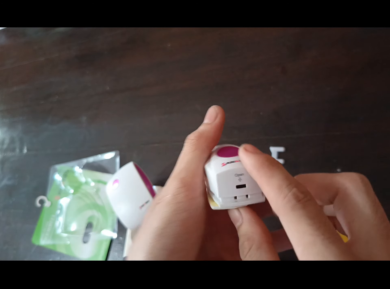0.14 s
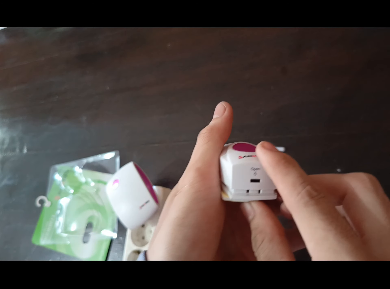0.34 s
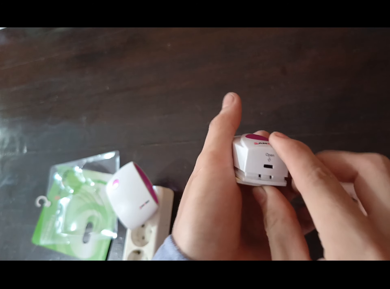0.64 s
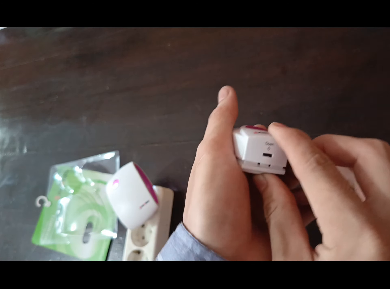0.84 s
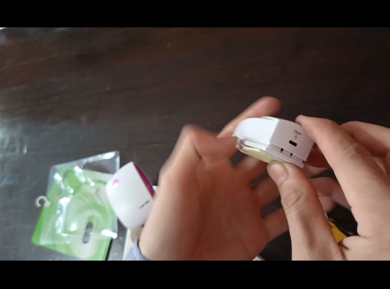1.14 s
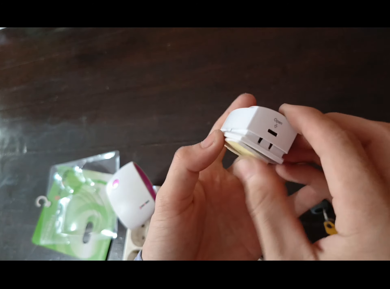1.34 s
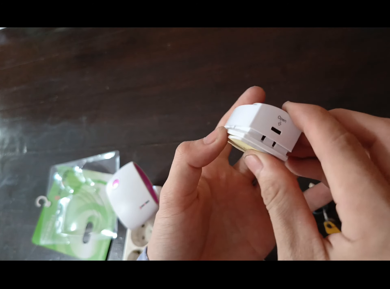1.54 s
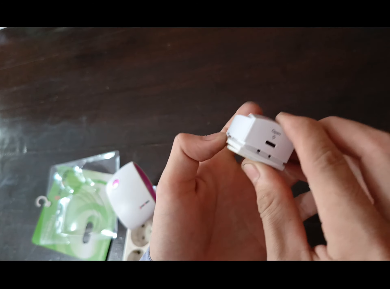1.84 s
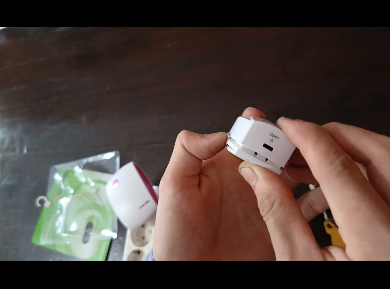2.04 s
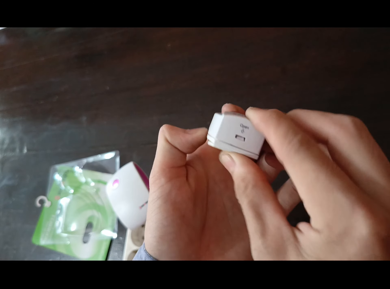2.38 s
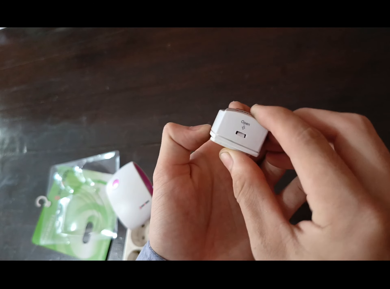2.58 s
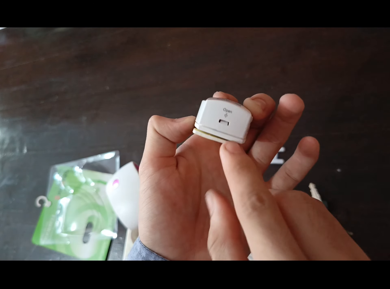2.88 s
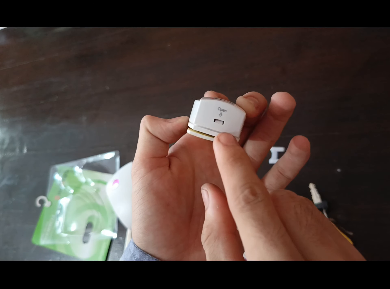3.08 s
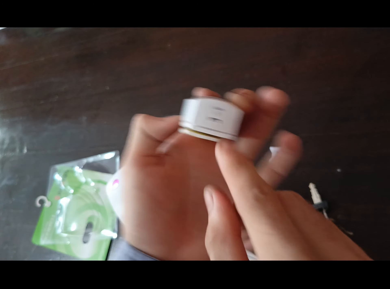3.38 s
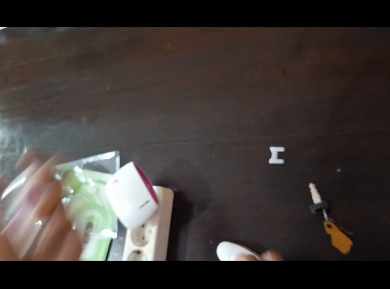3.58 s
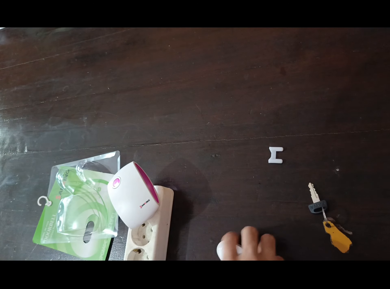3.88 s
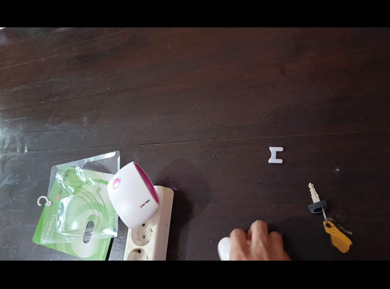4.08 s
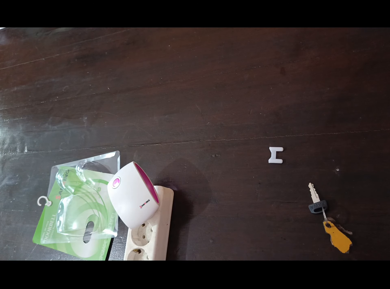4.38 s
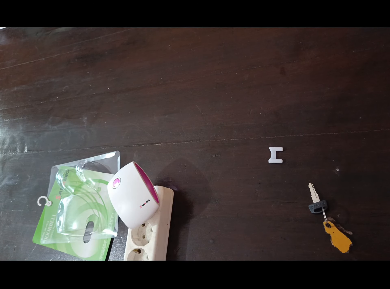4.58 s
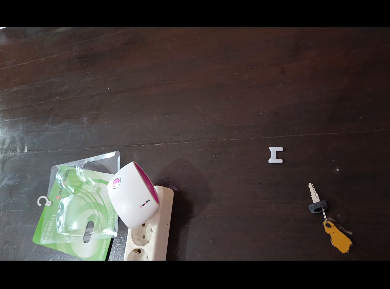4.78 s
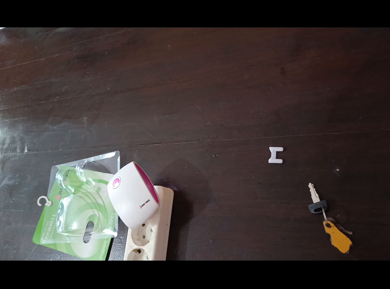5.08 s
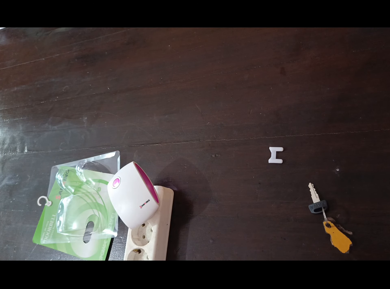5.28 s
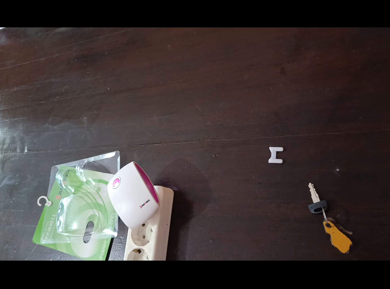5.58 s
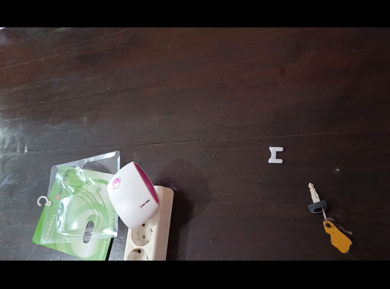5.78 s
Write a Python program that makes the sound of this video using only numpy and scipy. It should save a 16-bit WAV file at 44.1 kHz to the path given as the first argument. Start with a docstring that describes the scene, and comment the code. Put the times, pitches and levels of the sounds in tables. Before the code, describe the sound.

Close up in a quiet room, a small plastic casing clicks under pressure and snaps shut, followed by soft tabletop knocks.

```python
"""A small, quiet room: fingers press together a plastic plug-in receiver above a table, close to a phone.
Skin rubs; the seam slips in pops and creaks that ring the shell and the hollow of the hands.
The catch snaps shut, and the phone's limiter ducks the room's echo. Things put down knock on the table.
Behind it: room noise, a fading motor hum and faint birds outside."""
import sys
import numpy as np
from scipy import signal
from scipy.fft import rfft, irfft, next_fast_len
from scipy.io import wavfile
from scipy.ndimage import uniform_filter1d, minimum_filter1d

SR = 44100
rng = np.random.default_rng(int(sys.argv[2]) if len(sys.argv) > 2 else 0)


def unload_wav(signal):
    """Save mono or channel-first audio to the path in sys.argv[1] as 16-bit WAV at rate SR, clipped to [-1, 1]."""
    wavfile.write(
        sys.argv[1],
        SR,
        np.round(np.clip(np.atleast_2d(signal).T, -1, 1) * 32767).astype(np.int16),
    )


N = 261513
TIME_S = np.arange(N) / SR
RING_S = TIME_S[:SR // 2]

# room noise (frequency [Hz], gain [dB])
AIR_SPECTRUM = [(15, -69.5), (25, -36), (60, -1.5), (130, 1.5), (277, -2), (367, -6), (989, -10),
                (1250, -13), (2370, -15.5), (3290, -19.5), (4070, -19), (7000, -36), (9100, -63),
                (15400, -120)]
# room noise contour (time [s], relative level [dB])
AIR_CONTOUR = [(0.0, -60), (1.7, -64), (3.2, -64), (5.5, -62), (5.93, -59.5)]
# microphone hiss (frequency [Hz], gain [dB])
MIC_HISS_SPECTRUM = [(6500, -20), (8000, -18), (9000, -3.5), (10600, 1), (11600, -14.5), (13500, -25),
                     (15300, -8), (16000, -9.5)]
# distant calls (time [s], length [s], pitch [Hz], relative level [dB])
BIRD_CALLS = [(0.067, 0.18, 2530, -66.5), (0.168, 0.36, 2244, -66), (0.264, 0.0536, 4280, -68.5),
              (0.833, 0.096, 4300, -66.5), (4.162, 0.063, 3390, -68), (4.463, 0.059, 3510, -63.5),
              (5.205, 0.13, 2940, -68), (5.351, 0.03, 1920, -63), (5.415, 0.049, 2060, -61.5),
              (5.584, 0.034, 1874, -59.5), (5.625, 0.029, 3230, -63.5), (5.719, 0.052, 2270, -61)]
# skin on plastic and table (start [s], end [s], level [dB], relative hiss [dB])
SKIN_RUBS = [(0.268, 0.322, -77, 1), (1.069, 1.237, -77, -14.5), (2.819, 2.917, -67, -16.5),
             (3.48, 3.703, -71.5, -12.5), (3.719, 3.89, -68.5, -16), (3.941, 4.447, -78.5, -10.5),
             (4.589, 4.665, -72.5, -6.5)]
# body of a rub (frequency [Hz], gain [dB])
RUB_SPECTRUM = [(200, -0.5), (1000, -38.5), (2500, -1.5), (4400, -4.5), (6000, -11), (8000, -28),
                (16000, -40)]
# hiss of a rub (frequency [Hz], gain [dB])
SKIN_HISS_SPECTRUM = [(4000, -27), (8000, -6), (10000, -3), (12000, -2), (13500, -4), (15300, -2.5),
                      (16500, -3)]
# seam pops (time [s], relative level [dB], hollow resonance [Hz], shell brightness [dB])
SEAM_POPS = [(0.4454, -34.5, 1270, -14.5), (0.61, -38, 1097, -31), (0.7302, -39, 1080, -30),
             (0.8279, -13, 1007, -23), (.918, -30, 960, -20), (0.9909, -38, 980, -12.5),
             (1.0655, -47, 970, -16), (1.104, -45.5, 980, -2), (1.4068, -6, 1148, -16.5),
             (1.533, -40, 1310, -36), (1.5918, -28.5, 1136, -29.5), (1.6827, -9, 1065, -21.5),
             (1.6873, -15.5, 1080, -15.5), (1.988, -45, 980, -21), (2.4084, -29, 978, -20),
             (2.774, -44, 960, -2)]
# yield, jump and after-slip of each pop (lag [s], gain [dB], pitch ratio)
POP_SLIPS = [(-.0025, -22, .95), (0, 0, 0.99), (.0056, -18, 1.18)]
# seam under the thumb (start [s], end [s], slip rate [1/s], relative level [dB])
SEAM_CREAKS = [(1.335, 1.399, 174, -40.5), (1.81, 1.9, 15, -43.5), (2.273, 2.385, 21.4, -42.5),
               (2.326, 2.36, 45, -48)]
# shell at the reference grip (frequency [Hz], gain [dB], t60 [s])
SHELL_MODES = [(2660, -5, 0.0072), (3070.6, -2.5, 0.0048), (3370, -3, 0.008), (3964, -7.5, 0.0071),
               (4620, 0, .0095), (6400, -13.5, .009)]
# plastic crack (frequency [Hz], gain [dB])
CRACK_SPECTRUM = [(100, -30), (600, -13), (1200, 6.5), (4900, 3), (5600, -17), (7300, -13.5), (8600, -26.5),
                  (10000, -21.5), (11600, -15), (13500, -25), (15500, -18.5)]
# catch jumping home (time [s], relative level [dB], contact time [ms])
CATCH_IMPACTS = [(2.4263, -27, 0.063), (2.4291, -12, .04), (2.4299, 9, 0.0142), (2.432, -1.5, .09),
                 (2.4328, -1.5, .1)]
# catch and metal contacts (frequency [Hz], gain [dB], t60 [s])
CATCH_MODES = [(268.4, -28, 0.015), (490, -32, 0.01488), (898.8, -25.5, 0.006), (1289, -14, 0.0044),
               (1640, -5.5, .007), (2600, -5.5, 0.01), (3580, -5.4, 0.0076), (4048, -0.2, .007),
               (4520, -4, 0.0073), (6827, -28.5, 0.0063), (1402, -44.5, 0.31), (1590, -39.5, 0.34),
               (1957, -46, .35), (2568, -44.5, 0.35), (3147, -49, .35), (3910, -45, 0.19),
               (4643, -45.5, .22)]
# snap summed over all directions (frequency [Hz], gain [dB])
SNAP_SPREAD_SPECTRUM = [(60, -24.5), (150, -11.5), (450, -7.5), (650, -13.5), (900, -3.5), (1250, -5),
                        (1600, -2.5), (2050, -3), (2600, -1.5), (4500, 0), (5800, -12), (7200, -18.5),
                        (8400, -31), (11500, -25.5), (13600, -36), (15500, -31.5)]
# things put down (time [s], relative level [dB], clatter t60 [s], thud gain [dB], loss per bounce [dB])
TABLE_KNOCKS = [(3.492, -50, 0.061, -23, 17), (3.9548, -35, 0.015, -24, 7), (4.0452, -46, 0.051, 4.5, 9),
                (4.19, -62.5, 0.23, 7.5, 11), (4.325, -62, 0.15, 8.5, 7), (5.1318, -46.5, 0.12, -4.5, 2)]
# clatter of a knock (frequency [Hz], gain [dB])
CLATTER_SPECTRUM = [(100, -4), (400, -0.5), (700, 6), (1000, -8.5), (1400, 1.5), (2500, -5), (4500, -11.5),
                    (6500, -24.5), (8500, -42), (15000, -39.5)]
# table top (frequency [Hz], gain [dB], t60 [s])
TABLE_MODES = [(128, -10, 0.27), (222, -2, 0.053), (354, -5.5, 0.081), (506, -3.5, 0.056), (656, 1, 0.028),
               (776, 5.5, 0.013)]
# room echo (frequency [Hz], gain [dB])
ECHO_SPECTRUM = [(100, -5), (450, -3), (800, -2), (1020, -8), (1380, 2.5), (1800, -1), (3200, -1.5),
                 (4600, -2.5), (6300, 3), (9000, -3), (15000, 5)]


def undb(db):
    """Decibels to gain."""
    return 10 ** (np.asarray(db) / 20)


def add(track, at_s, sound):
    """Mix a sound into the track."""
    start = int(at_s * SR)
    track[start:start + len(sound)] += sound[:N - start]


def colour(x, spectrum):
    """Filter by (frequency [Hz], gain [dB]) points."""
    hz, db = np.transpose(spectrum)
    size = next_fast_len(len(x), real=True)
    bins_hz = np.fft.rfftfreq(size, 1 / SR)
    gain = undb(np.interp(np.log(bins_hz + 1), np.log(hz), db))
    return irfft(rfft(x, size) * gain, size)[:len(x)]


def noise(spectrum, size):
    """Coloured noise, rms 1."""
    x = colour(rng.standard_normal(size), spectrum)
    return x / x.std()


def walk(rate_hz, size):
    """Random wander, spread near 1."""
    knots = rng.standard_normal(int(size / SR * rate_hz) + 2)
    return np.interp(np.arange(size) / SR * rate_hz, np.arange(len(knots)), knots)


def fade(t60_s):
    """Free decay."""
    return np.exp(-np.log(1000) * RING_S / t60_s)


def ring(modes):
    """Struck modes (frequency [Hz], gain [dB], t60 [s])."""
    return sum(undb(db) * fade(t60_s) * np.sin(2 * np.pi * hz * RING_S) for hz, db, t60_s in modes)


def attack(rise_s):
    """Contact force building up."""
    return 1 - np.exp(-RING_S / rise_s)


def radiate(x, cutoff_hz):
    """A small body radiates little bass."""
    return signal.sosfilt(signal.butter(2, cutoff_hz, "high", fs=SR, output="sos"), x)


def flicker(x, depth_db, steady_below_hz=250):
    """Narrow bands swell and sink independently; the rumble stays even."""
    hz, _, spectra = signal.stft(x, SR, nperseg=1024)
    drift = uniform_filter1d(rng.standard_normal(spectra.shape), size=6, axis=0)
    drift = uniform_filter1d(drift, size=5, axis=1)
    band_depth_db = depth_db * np.minimum(hz / steady_below_hz, 1)[:, None] ** 2
    return signal.istft(spectra * undb(band_depth_db * drift / drift.std()))[1][:N]


def motor_hum(hz=135, start_db=-60.5, fade_db_per_s=2, drop_at_s=0.55, drop_s=0.306, drop_db=8.5):
    """Distant motor: a wavering tone that fades throughout and steps down once."""
    phase = 2 * np.pi * np.cumsum(hz * (1 + 0.02 * walk(11, N))) / SR
    drop = np.clip((TIME_S - drop_at_s) / drop_s, 0, 1)
    level_db = start_db - fade_db_per_s * TIME_S - drop_db * drop
    return np.sqrt(2) * np.sin(phase) * undb(level_db + 2 * walk(16, N))


def room_noise(gain_db=1.5, wander_db=0.71):
    """Low, restless wash of air."""
    air = flicker(noise(AIR_SPECTRUM, N), depth_db=2)
    contour_db = np.interp(TIME_S, *np.transpose(AIR_CONTOUR))
    return air * undb(contour_db + gain_db + wander_db * walk(8.9, N))


def chirp(length_s, pitch_hz, scoop=0.1, scoop_s=0.016, sag_per_s=0.22, waver=0.07):
    """One call, blurred by distance: scoops up to pitch, then sags."""
    size = int(length_s * SR)
    t = TIME_S[:size]
    glide = 1 - scoop * np.exp(-t / scoop_s) - sag_per_s * t
    hz = pitch_hz * glide * (1 + waver * walk(900, size))
    swell = np.sqrt(np.hanning(size)) * undb(4.2 * walk(140, size))
    return swell * np.sin(2 * np.pi * np.cumsum(hz) / SR)


def birds(twitter_per_s=0.95, twitter_hz=4405, twitter_s=0.07, twitter_gain_db=-74, pitch_spread=0.13):
    """Calls far outside, plus fainter high twitter at random."""
    out = np.zeros(N)
    for at_s, length_s, hz, db in BIRD_CALLS:
        add(out, at_s, undb(db) * chirp(length_s, hz))
    for when, pitch in rng.random((int(twitter_per_s * N / SR), 2)):
        hz = twitter_hz * (1 + pitch_spread * (2 * pitch - 1))
        add(out, when * TIME_S[-1], undb(twitter_gain_db) * chirp(twitter_s, hz))
    return out


def skin_rubs(grain_db=4, grain_hz=300):
    """Sliding skin grips and lets go rapidly: soft swishes."""
    out = np.zeros(N)
    for start_s, end_s, db, hiss_db in SKIN_RUBS:
        size = int((end_s - start_s) * SR)
        force = np.sqrt(np.hanning(size)) * undb(db + grain_db * walk(grain_hz, size))
        friction = noise(RUB_SPECTRUM, size) + undb(hiss_db) * noise(SKIN_HISS_SPECTRUM, size)
        add(out, start_s, force * friction)
    return out


def crack(t60_s):
    """Noise burst of struck plastic."""
    return noise(CRACK_SPECTRUM, len(RING_S)) * fade(t60_s)


def seam_slip(db, hollow_hz, bright_db, reference_grip_hz=1170):
    """One slip: the hollow of the hands rings, the shell ticks, the palm thuds."""
    hollow_t60_s = 0.014 * np.exp(0.0125 * db)  # harder slips ring longer
    hollow = 1.78 * ring([(hollow_hz, 0, hollow_t60_s)]) * attack(0.00073)
    flesh_lowpass = signal.butter(3, 1.28 * hollow_hz, fs=SR, output="sos")
    hollow = signal.sosfilt(flesh_lowpass, hollow)
    # a tighter grip shrinks the hollow and stiffens the shell: both rise in pitch
    stiffening = np.sqrt(hollow_hz / reference_grip_hz)
    modes = [(hz * stiffening, mode_db, t60_s) for hz, mode_db, t60_s in SHELL_MODES]
    shell = undb(-1.5) * ring(modes) + undb(-5) * crack(t60_s=0.014)
    palm = ring([(190, -11, 0.018), (514, -5.5, 0.0087), (664, -10, 0.0075)])
    contact = (undb(bright_db) * shell + undb(-23) * palm) * attack(0.00029)
    return undb(db) * (hollow + contact)


def seam(creak_hz=1010, jitter_s=0.00048, jitter_db=1.1):
    """The seam gives way: three slips per pop, uneven runs of small slips per creak."""
    out = np.zeros(N)
    for at_s, db, hz, bright_db in SEAM_POPS:
        for lag_s, step_db, ratio in POP_SLIPS:
            add(out, at_s + lag_s, seam_slip(db + step_db, hz * ratio, bright_db))
    for start_s, end_s, slips_per_s, db in SEAM_CREAKS:
        times_s = np.arange(start_s, end_s, 1 / slips_per_s)
        for at_s, (late, force) in zip(times_s, rng.standard_normal((len(times_s), 2))):
            slip = seam_slip(db + jitter_db * force, creak_hz, bright_db=-26.5)
            add(out, at_s + jitter_s * late, slip)
    return radiate(out, cutoff_hz=110)


def catch_snap():
    """The catch closes in a quick run of impacts; longer contacts are duller."""
    out = np.zeros(N)
    for at_s, db, contact_ms in CATCH_IMPACTS:
        blow = (ring(CATCH_MODES) + undb(-12) * crack(t60_s=0.013)) * attack(0.00033)
        pole = np.exp(-1000 / (contact_ms * SR))
        add(out, at_s, undb(db) * signal.lfilter([1 - pole], [1, -pole], blow))
    return radiate(out, cutoff_hz=189.3)


def snap_spread(gain_db=22):
    """Pulse that the hardest catch impact sends to the walls."""
    hardest_s, _, _ = max(CATCH_IMPACTS, key=lambda row: row[1])
    impulse = np.zeros(N)
    add(impulse, hardest_s, [undb(gain_db)])
    return colour(impulse, SNAP_SPREAD_SPECTRUM)


def table_knocks(bounces=5, bounce_s=0.0102):
    """Each thing bounces ever weaker: clatter over the thud of the table top."""
    out = np.zeros(N)
    for at_s, db, t60_s, thud_db, loss_db in TABLE_KNOCKS:
        for bounce in range(bounces):
            clatter = noise(CLATTER_SPECTRUM, len(RING_S)) * fade(t60_s)
            blow = (clatter + undb(thud_db) * ring(TABLE_MODES)) * attack(0.00063)
            add(out, at_s + bounce * bounce_s, undb(db - bounce * loss_db) * blow)
    return radiate(out, cutoff_hz=70)


def room_echo(x, low_t60_s=0.37, treble_t60_s=0.3, split_hz=3500, first_s=0.0022, build_s=0.016):
    """Small hard room: uneven reflections, treble dying sooner."""
    tail = noise(ECHO_SPECTRUM, len(RING_S)) * undb(1.5 * walk(500, len(RING_S)))
    low = signal.sosfilt(signal.butter(1, split_hz, fs=SR, output="sos"), tail)
    onset = np.clip((RING_S - first_s) / build_s, 0, 1)
    response = (low * fade(low_t60_s) + (tail - low) * fade(treble_t60_s)) * onset
    return signal.fftconvolve(x, response / np.linalg.norm(response))[:N]


def scene():
    """Mono mix: hands close; knocks and birds further off and wetter."""
    hands = seam() + skin_rubs()
    knocks = table_knocks()
    calls = birds()
    echo = room_echo(undb(-9) * hands + snap_spread() + undb(-7.5) * knocks + undb(-1.5) * calls)
    direct = hands + catch_snap() + knocks + undb(2) * calls
    background = motor_hum() + room_noise() + undb(-82) * noise(MIC_HISS_SPECTRUM, N)
    return (direct + echo + background)[None]


def limiter(x, ceiling_db=-3, release_db_per_s=90):
    """Peaks over the ceiling pull the gain down at once; it climbs back steadily."""
    over_db = np.maximum(20 * np.log10(np.abs(x) + 1e-9) - ceiling_db, 0)
    climb_db = release_db_per_s * TIME_S
    gain_db = climb_db - np.maximum.accumulate(over_db + climb_db, axis=-1)
    held_db = minimum_filter1d(gain_db, size=129)
    return x * undb(uniform_filter1d(held_db, size=65))


def record(dry):
    """Phone: limiter, then a steep low-pass."""
    top_hz = 15900
    lowpass = signal.ellip(8, 0.2, 70, top_hz, fs=SR, output="sos")
    return signal.sosfilt(lowpass, limiter(dry))


dry = scene()
out = record(dry)
unload_wav(out)
```